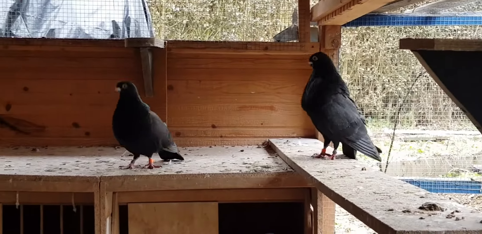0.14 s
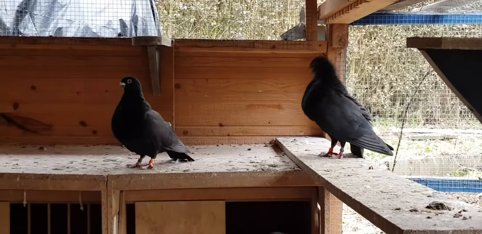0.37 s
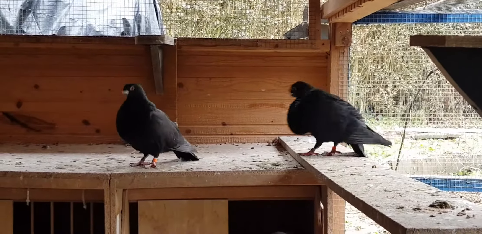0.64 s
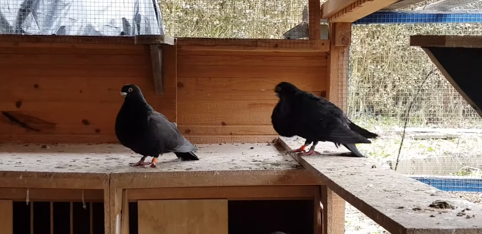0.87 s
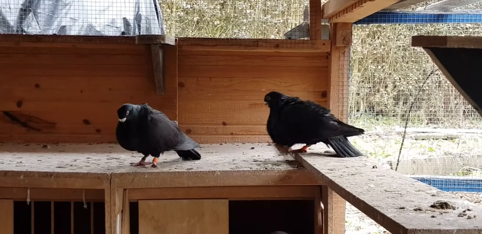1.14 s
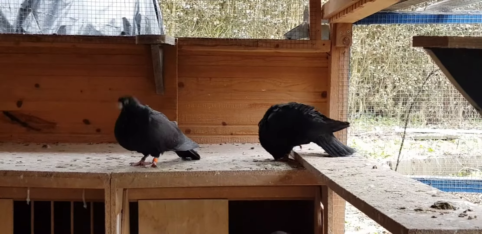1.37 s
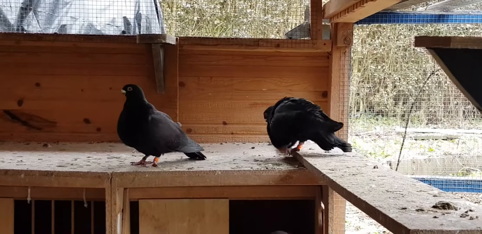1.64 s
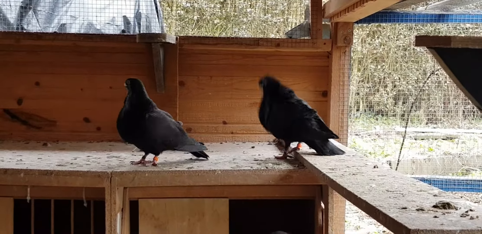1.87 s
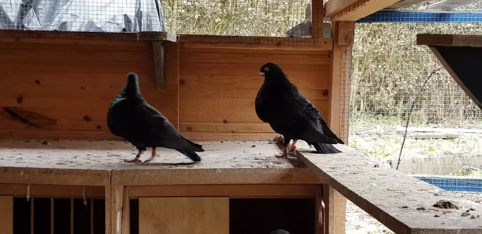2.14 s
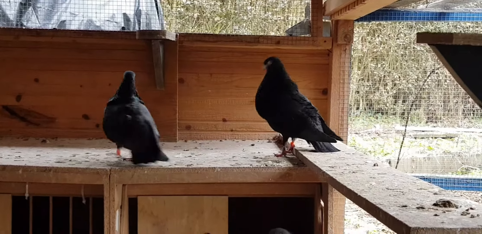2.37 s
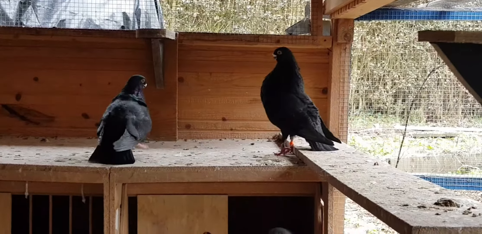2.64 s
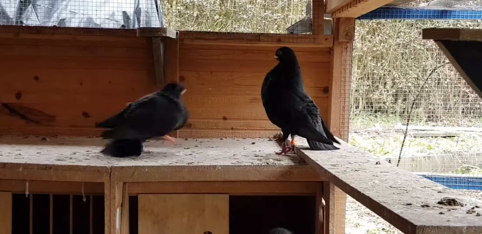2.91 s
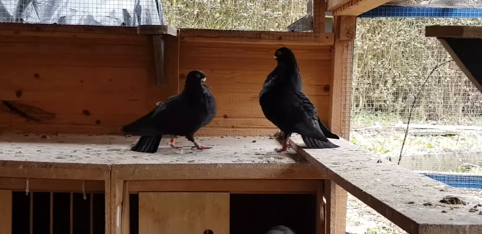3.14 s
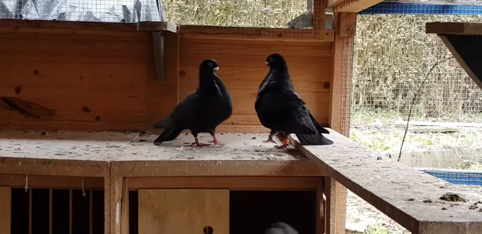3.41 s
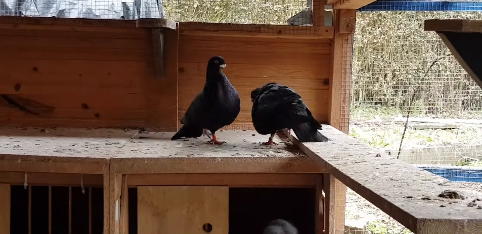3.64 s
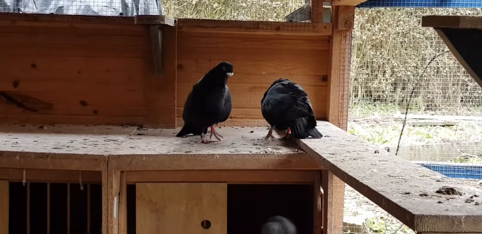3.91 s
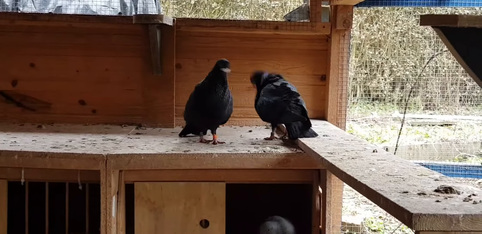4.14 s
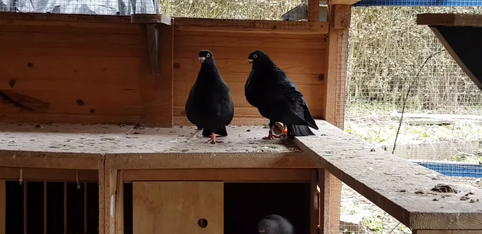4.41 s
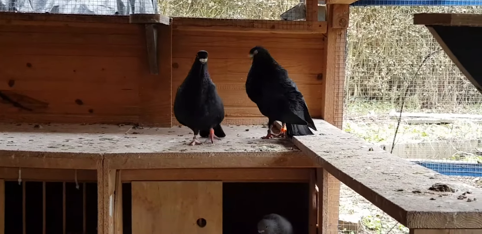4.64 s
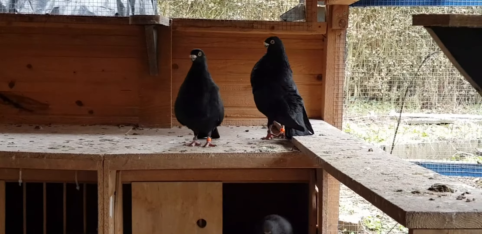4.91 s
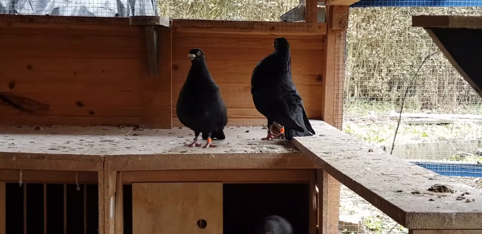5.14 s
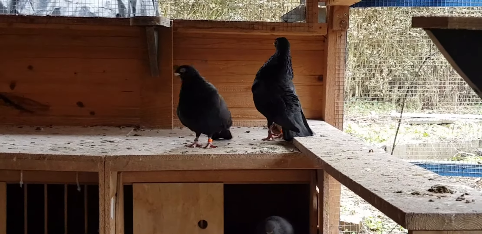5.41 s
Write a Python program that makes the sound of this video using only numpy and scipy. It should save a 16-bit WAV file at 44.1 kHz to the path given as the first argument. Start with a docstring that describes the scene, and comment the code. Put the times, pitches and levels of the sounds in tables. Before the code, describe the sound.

Low hollow pigeon coos rise and fall close by, some rolling in the throat, above soft outdoor rumble, claw ticks and brief chirping.

```python
"""From the start a pouter pigeon coos in a wooden loft: gliding partials, some clear, some rolled by throat
flutter, ring on the loft's air modes with far coos as sine glides and two dull knocks near 3.6 s. A young bird
wheezes in bursts of resonant noise over an outdoor rumble and a feather rustle of shaped noise that swells
near three seconds. Small birds chirp outside early, again midway and at the end, as fluttering sine glides.
Soon claws and feathers tick, scrape and thud on the boards; near the end the pouter adds a short grunt."""
import sys
import numpy as np
from scipy import signal
from scipy.fft import rfft, irfft
from scipy.io import wavfile
from scipy.ndimage import uniform_filter1d

SR = 44100
rng = np.random.default_rng(int(sys.argv[2]) if len(sys.argv) > 2 else 0)


def invert_db(x):
    """Field ratio 10**(x/20) for x, a level in decibels (scalar or array-like)."""
    u = np.asarray(x, float) / 20
    return 10 ** u


def dump_mix(stems):
    """Bounce the given channels to the path in sys.argv[1] as a 16-bit WAV at rate SR."""
    frames = np.atleast_2d(stems).T  # one column per channel
    limited = np.clip(frames, -1, 1)  # hard clip at full scale
    pcm = np.round(limited * 32767).astype(np.int16)
    wavfile.write(sys.argv[1], SR, pcm)


N = 243873
T = np.arange(N) / SR

# rolled coos: top_s, hold_s, top_hz, held_hz (after the hold), level_db (before the loft), held_roll (0-1)
ROLLED_COOS = [(1.806, 0.16, 325.6, 329.4, -39, 0.89), (4.193, .08, 349.9, 316.9, -36.5, 0.59)]
# way into a roll: offset_s (from the top), pitch_hz, offset_db (from the top level), roll (0-1)
ROLL_ENTRY = [(-.22, 236.3, -2, 0.91), (-.12, 261, -2, 0.76)]
# noise colour of claws and feathers on wood: freq_hz, density_db (relative, per Hz)
SCRAPE_COLOUR = [(1300, -21.5), (4600, -5.5), (8100, -19.5), (11800, -12), (15000, -19)]


def rms_one(x):
    """Scale to rms 1."""
    return x / np.sqrt(np.mean(x ** 2) + 1e-20)


def in_time(rows):
    """Columns of a curve, one value a sample; the first column is the time in s."""
    s, *columns = np.transpose(rows)
    return [np.interp(T, s, column) for column in columns]


def at_hz(points, hz):
    """Read a spectrum table on a log-frequency axis."""
    table_hz, values = np.transpose(points)
    return np.interp(np.log(hz), np.log(table_hz), values)


def swell(s, length_s, power):
    """Share of a note gone by, and a rounded rise and fall over it."""
    gone = np.clip((T - s) / length_s, 0, 1)
    return gone, np.sin(np.pi * gone).clip(0) ** power


def drift(rate_hz):
    """Random wander of rms 1: noise through two equal low-pass poles."""
    r = np.exp(-2 * np.pi * rate_hz / SR)
    noise = rng.standard_normal(N + SR)
    return rms_one(signal.lfilter([1], [1, -2 * r, r * r], noise)[SR:])


def resonance(x, hz, width_hz):
    """Two-pole resonance, gain 1 on top."""
    r = np.exp(-np.pi * width_hz / SR)
    poles = [1, -2 * r * np.cos(2 * np.pi * hz / SR), r * r]
    return signal.lfilter([(1 - r * r) / 2, 0, (r * r - 1) / 2], poles, x + 1e-18)


def twice_resonant(x, hz, width_hz):
    """The same resonance passed twice, for steeper skirts."""
    return resonance(resonance(x, hz, width_hz), hz, width_hz)


def coloured(spectrum):
    """Stereo noise of a given spectrum, alike in the bass and unrelated in the treble; rms 1."""
    # left-right correlation: freq_hz, likeness (0-1)
    likeness = [(100, .95), (600, .8), (1400, .1), (14000, 0)]
    mid, side = rfft(rng.standard_normal((2, N)))
    hz = np.arange(len(mid)) * SR / N + 1
    alike = np.clip(at_hz(likeness, hz), -1, 1)
    both = np.sqrt(1 + alike) * mid + np.sqrt(1 - alike) * side * [[1], [-1]]
    return rms_one(irfft(invert_db(at_hz(spectrum, hz)) * both, N))


def whistles(notes, waver):
    """Slightly wavering sine glides, each under a rounded swell."""
    shake = 1 + waver * drift(27.0)
    out = 0
    for s, length_s, from_hz, to_hz, level_db in notes:
        gone, shape = swell(s, length_s, 0.12)
        pitch = from_hz + (to_hz - from_hz) * gone
        sine = np.sin(2 * np.pi * np.cumsum(pitch * shake) / SR)
        out = out + invert_db(level_db + 9.0) * shape * sine
    return out


def clear_coo(s, top_s, hz, turn_s, db, early_fall, runs_out):
    """A clear coo as rows of (s, Hz, dB, roll): opening, arch up to the top, fall through the turn pitch."""
    # shared opening: offset_s (from the start), pitch_hz, level_db (before the loft), roll (0-1)
    opening = [(0, 181, -53.5, .05), (.025, 198, -34, 0.1), (0.082, 218, -34, 0.1),
               (.145, 253.4, -40.5, 0.53), (0.179, 299.4, -34.5, 0.04)]
    # climb to the top: time_share, pitch_share, offset_db (from the top level)
    climb = [(0.446, 0.604, -5.5)]
    # later point of the fall: time_share, pitch_share (on top of the early fall), offset_db (from the top level)
    late = (.65, 0.35, -2.5)
    # running out: offset_s (from the turn), pitch_hz, level_db (before the loft), roll (0-1)
    tail = (.075, 197, -45, .8)
    turn_hz, turn_db, turn_roll = 250.4, -42, 0.24
    early_share, early_db = .3, -2.5    # share of the fall time, dB from the top level

    rows = [(s + ds, f, d, r) for ds, f, d, r in opening]
    from_s, from_hz, _, clear = rows[-1]
    for u, v, d in climb:
        rows.append((from_s + u * (top_s - from_s), from_hz + v * (hz - from_hz), db + d, clear))
    rows.append((top_s, hz, db, clear))
    fall = [(early_share, early_fall, early_db), (late[0], early_fall + late[1], late[2])]
    for u, v, d in fall:
        rows.append((top_s + u * (turn_s - top_s), hz + v * (turn_hz - hz), db + d, clear))
    rows.append((turn_s, turn_hz, turn_db, turn_roll))
    if runs_out:
        rows.append((turn_s + tail[0], *tail[1:]))
    return rows


def rolled_coo(s, hold_s, hz, held_hz, db, held_roll):
    """A rolled coo as rows of (s, Hz, dB, roll): the throat flutters in, holds and lets the pitch sink."""
    # way out: offset_s (from the end of the hold), pitch_hz, offset_db (from the top level), roll (0-1)
    roll_exit = [(0.068, 244.9, -4, 0.94), (0.172, 185.7, -8, 0.95)]
    end_s = s + hold_s
    rows = [(s + ds, f, db + d, r) for ds, f, d, r in ROLL_ENTRY]
    rows += [(s, hz, db, held_roll), (end_s, held_hz, db, held_roll)]
    return rows + [(end_s + ds, f, db + d, r) for ds, f, d, r in roll_exit]


def song():
    """Pitch, level and roll of the pouter, built note by note from the shared shapes."""
    # clear coos: start_s, top_s, top_hz, turn_s (sinking through the turn pitch),
    # top_db (before the loft), early_fall (share of the fall made early)
    coos = [(-.125, 0.28, 374.7, 0.45, -29, 0.24), (0.905, 1.265, 442, 1.513, -28, .33),
            (2.208, 2.548, 377.5, 2.74, -29.5, 0.23), (3.29, 3.643, 380.1, 3.855, -29, 0.1973),
            (4.489, 4.843, 350.4, 5.056, -30.5, 0.17)]
    # last short note: time_s, pitch_hz, level_db (before the loft), roll (0-1)
    grunt = [(5.22, 190, -49, .7), (5.27, 238, -45, .4), (5.31, 243, -39, .35), (5.36, 228, -45, .4)]
    pause_s, stop_s, start_s = .12, .06, .015   # gaps over twice pause_s fall silent; fade out, fade in

    notes = [grunt] + [rolled_coo(*roll) for roll in ROLLED_COOS]
    for coo in coos:
        turn_s = coo[3]
        roll_follows = any(0 < roll[0] + ROLL_ENTRY[0][0] - turn_s < 2 * pause_s for roll in ROLLED_COOS)
        notes.append(clear_coo(*coo, runs_out=not roll_follows))
    notes.sort()
    rows = []
    for note, following in zip(notes, notes[1:] + [[(np.inf, 0, 0, 0)]]):
        rows += note
        s, hz, _, roll = note[-1]
        next_s, next_hz, _, next_roll = following[0]
        if next_s - s > 2 * pause_s:
            rows.append((s + stop_s, hz, -95, roll))
            rows.append((min(next_s, N) - start_s, next_hz, -95, next_roll))
    return in_time(rows)


def pouter():
    """Three partials weighed by the crop; in a roll the throat flutter chops the air and swings the pitch."""
    # the inflated crop passes only a narrow range of any partial: freq_hz, gain_db (before partials are balanced)
    crop = [(190, -25), (250, -12), (285, 0), (515, 0), (560, -27), (670, -22), (770, -29), (950, -22),
            (1150, -29)]
    flutter_per_s, flutter_at_hz = 47, 325   # the flutter rate follows the pitch
    pitch, level_db, roll = song()
    roll = np.clip(roll, 0, 1)

    flutter_rate = flutter_per_s * pitch / flutter_at_hz * (1 + .25 * drift(9.0))
    flutter = 2 * np.pi * np.cumsum(flutter_rate) / SR
    chop = 1 + roll * (.7 * np.cos(flutter) * invert_db(2 * drift(15)) + .15 * drift(120))
    pitch = uniform_filter1d(pitch, size=SR // 25)      # muscles round the corners of a glide
    pitch *= 1 + .005 * drift(12.0) + roll * (0.035 * drift(90) + .11 * np.sin(flutter))
    phase = 2 * np.pi * np.cumsum(pitch) / SR

    # a rolling throat lets the crop filter less sharply; the upper partials flicker in clear notes
    orders = np.arange(1, 4)[:, None]
    flicker_db = (orders - 1) * 1.2 * (1 - roll) * drift(20)
    steady = uniform_filter1d(pitch, size=SR // 20)
    crop_db = (1 - .8 * roll) * at_hz(crop, orders * steady)
    slope_db = -3 * (1 + roll * (2 * orders - 5)) * (orders - 1) ** 2
    shares = invert_db(crop_db + slope_db + flicker_db)
    shares /= np.sqrt(np.sum(shares ** 2, axis=0) / 2)
    tone = np.sum(shares * np.sin(orders * phase), axis=0)

    # air rushes through the throat, and in a roll the throat slaps once a flutter
    breath = invert_db(-31.0) * rms_one(resonance(rng.standard_normal(N), 470, 160))
    slaps = np.diff(flutter // (2 * np.pi), prepend=0) * invert_db(2 * drift(40))
    breath += roll * invert_db(-8.0) * rms_one(twice_resonant(slaps, 490, 130))
    uneven_db = 1.5 * drift(49)     # the breath is uneven
    return invert_db(level_db + uneven_db) * chop * (tone + breath)


def far_coos_and_knocks():
    """Pigeons further off as short wavering sine glides, and two dull knocks near 3.6 s as 20-25 ms blips."""
    # coos and, as the last two rows, knocks: start_s, length_s, from_hz, to_hz, level_db (relative)
    notes = [(-.05, 0.068, 520, 466, -40), (1.16, 0.09, 450, 507.5, -44), (2.84, 0.4, 477.4, 451.4, -64.5),
             (3.13, 0.073, 405.4, 384, -49), (3.615, 0.025, 544, 581.7, -51),
             (3.643, 0.02, 635.3, 721, -51.5)]
    return whistles(notes, 0.014)


def loft(x):
    """Modes in phase with each other: a glide swells on each mode and dips between them; walls add a blur."""
    # air modes: freq_hz, width_hz, gain_db (mean of both sides), lean_db (right above left), late_ms (right side)
    modes = [(267.6, 28, -6.5, -2.5, -0.067), (303.8, 14, 1, -1.5, -0.1), (335.7, 9.1, 1, 10.5, 0.35),
             (367.1, 17.7, 9, 3.5, 0.22), (419.2, 26.6, 3.5, 2.5, 0.067), (466, 15, 3.5, -4, -0.12),
             (509, 24, 2, 1, 0.34), (636, 160, -4, 2, 0.075)]
    walls_db, walls_t60_s = -36.5, 0.49     # scattered echoes of the walls
    x = signal.sosfilt(signal.butter(4, 1050, fs=SR, output="sos"), x)   # feathers muffle the top
    out = invert_db(-12.0) * np.array([np.pad(x, (2, 0))[:N], x])    # direct sound, a touch later on the left
    for hz, width_hz, db, lean_db, late_ms in modes:
        mode = resonance(x, hz, width_hz)
        pair = np.array([mode, np.interp(T - late_ms / 1000, T, mode)])
        out = out + pair * invert_db(db + lean_db / 2 * np.array([[-1], [1]]))
    age = T[:SR // 2]
    echoes = rng.standard_normal((2, len(age))) * invert_db(walls_db - 60 * age / walls_t60_s)
    echoes += .4 * echoes[::-1]    # partly alike left and right
    x = signal.sosfilt(signal.butter(2, 215, "high", fs=SR, output="sos"), x)   # thin boards let the bass out
    return out + signal.fftconvolve(x[None], echoes, axes=1)[:, :N]


def loft_dips():
    """Gain of all that rings in the loft: the level dips briefly, by 8 dB at the middle of a lone dip."""
    # middle of each dip: time_s
    dips = [.176, .341, .385, 1.142, 1.205, 1.326, 1.403, 2.521, 2.616, 3.553, 3.715, 4.725, 4.905]
    dip_db, dip_s = -8, .009
    return invert_db(dip_db * sum(np.exp(-((T - s) / dip_s) ** 2) for s in dips))


def wheezes():
    """A young bird: breath noise in two throat resonances, leaning to the right."""
    # breaths: start_s, length_s, level_db (before lean and flicker)
    breaths = [(-.2, 0.76, -74), (1.156, 0.59, -65.5), (3.112, .65, -62), (5.106, 1, -57.5)]
    # throat resonances: freq_hz, width_hz (each of two passes takes 0.49 of it), level_db (relative)
    throat = [(2160, 1440, -7), (3900, 1200, -9.5)]
    noise = rng.standard_normal((2, N))
    wheeze = rms_one(sum(invert_db(db) * twice_resonant(noise, hz, 0.49 * width_hz) for hz, width_hz, db in throat))
    effort = sum(invert_db(db) * swell(s, length_s, 0.78)[1] for s, length_s, db in breaths)
    return wheeze * effort * invert_db(np.array([[-4.0], [4.0]]) + 1.5 * drift(8))


def outdoor_air():
    """Low outdoor rumble with a weak upper hiss: shaped noise whose level wanders slowly."""
    # freq_hz, density_db (relative, per Hz)
    colour = [(25, -25.5), (55, -4), (110, -7), (200, -13), (450, -16.5), (800, -29), (1500, -40),
              (3000, -45), (4200, -39), (6700, -46.5), (7200, -62), (8600, -63), (11500, -43.5),
              (15000, -46)]
    return invert_db(-49.5 + 1.2 * drift(4.2)) * coloured(colour)


def rustle():
    """A tail dragged over the board: feather noise with an unsteady level."""
    # time_s, level_db (before the flicker)
    drag = [(2.6, -73), (3.05, -65.5), (3.7, -66), (3.8, -90)]
    return invert_db(in_time(drag)[0] + 1.6 * drift(34.0)) * coloured(SCRAPE_COLOUR)


def chirps():
    """Small birds outside: sine glides whose level flutters in small throats."""
    # start_s, length_s, from_hz, to_hz, level_db (relative)
    notes = [(.11, 0.042, 4340, 4730, -63), (.125, 0.042, 3790, 3740, -67.5),
             (.205, 0.055, 4553, 3530, -60), (.265, 0.063, 3380, 3484, -69.5),
             (1.345, 0.068, 4200, 4840, -67.5), (1.425, 0.13, 6180, 6270, -77.5),
             (1.56, 0.069, 6170, 5480, -78.5), (5.14, 0.12, 5244, 6145, -74),
             (5.257, 0.017, 4446, 4800, -62.5), (2.81, 0.043, 3645, 4574, -62.5),
             (2.83, 0.045, 4730, 5616, -66), (5.052, 0.038, 4008, 4145, -65),
             (5.275, 0.045, 4963, 4910, -55), (5.343, 0.023, 5610, 6630, -56.5),
             (5.366, 0.049, 5546, 5750, -53.5), (5.478, 0.033, 4470, 5260, -55),
             (5.5, 0.032, 4870, 3900, -48)]
    return whistles(notes, .005) * invert_db(2 * drift(60))


def yard(x):
    """Outdoor sound leans to the right with a smear of echoes, unrelated left and right."""
    age = T[:SR // 2]
    echoes = rng.standard_normal((2, len(age))) * invert_db(-33 - 60 * age / .27)
    smear = signal.fftconvolve(x[None], echoes, axes=1)[:, :N]
    return (invert_db(-11.0) * x + smear) * invert_db(np.array([[-4.0], [2.5]]))


def steps():
    """Each contact: a tick and a dying scrape, a duller knock, and the board's low thud."""
    # contacts: start_s, peak_db (relative), dull_db (1-2 kHz knock against the peak), thud_db (relative)
    contacts = [(0.7564, -64, 13, -67), (0.968, -70.5, 15.5, -63), (1.8925, -51, -7, -79),
                (2.1194, -58, -1.5, -51.5), (2.5077, -57.5, -14, -67.5), (2.7994, -55, 0, -68),
                (3.051, -39.5, -9, -42.5), (3.1507, -46.5, -20, -67), (3.2095, -53.5, 0.5, -47),
                (3.6812, -48, 3, -43.5), (4.116, -54, -1.5, -76), (4.46, -54.5, -10, -70.5),
                (4.584, -57.5, -8, -72), (4.9431, -53.5, -4.5, -48)]
    scrape, knock, thud = np.zeros((3, N))
    for s, peak_db, dull_db, thud_db in contacts:
        begun = T >= s
        age = np.maximum(T - s, 0)
        dying = begun * invert_db(-60 * (age / 0.24) ** 1.33)
        firmness = invert_db(.5 * (peak_db + 54.0))   # firmer contacts tick more
        tick = firmness * begun * invert_db(4 - 60 * age / 0.015)
        scrape += invert_db(peak_db - 10.5) * (dying * np.minimum(age / .003, 1) + tick)
        knock += invert_db(peak_db + dull_db - 11) * dying
        thud += invert_db(thud_db - 1.0) * dying * np.minimum(age / 0.0023, 1)
    grains = invert_db(2.0 * drift(510.0))
    wood = rms_one(twice_resonant(rng.standard_normal((2, N)), 1500, 1300))
    wood = wood * invert_db(np.array([[-3.0], [2.0]]))   # the boards lie to the right
    noise = rng.standard_normal(N)
    board = rms_one(twice_resonant(noise, 150, 98)) + invert_db(-5.5) * rms_one(resonance(noise, 570, 280))
    return grains * (scrape * coloured(SCRAPE_COLOUR) + knock * wood) + thud * board


def scene():
    """Coos and the two dull knocks ring in the loft, chirps in the yard; the rest adds directly."""
    in_loft = loft_dips() * loft(pouter() + far_coos_and_knocks())
    return in_loft + wheezes() + outdoor_air() + rustle() + yard(chirps()) + steps()


def roll_off(x):
    """The treble ends steeply here."""
    return signal.sosfilt(signal.butter(12, 15320, fs=SR, output="sos"), x)


def record(dry):
    """The finished mix passes on at its own level."""
    return roll_off(dry)


dry = scene()
out = record(dry)
dump_mix(out)
```